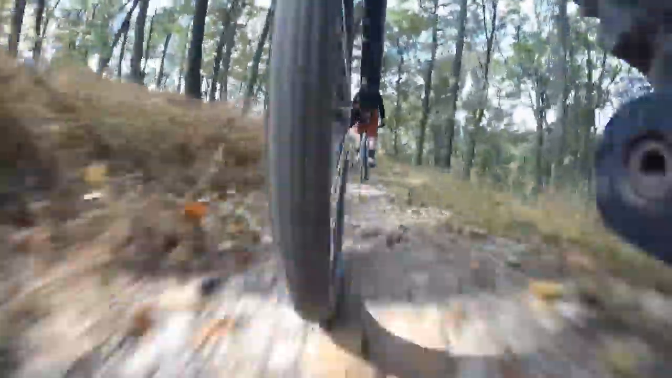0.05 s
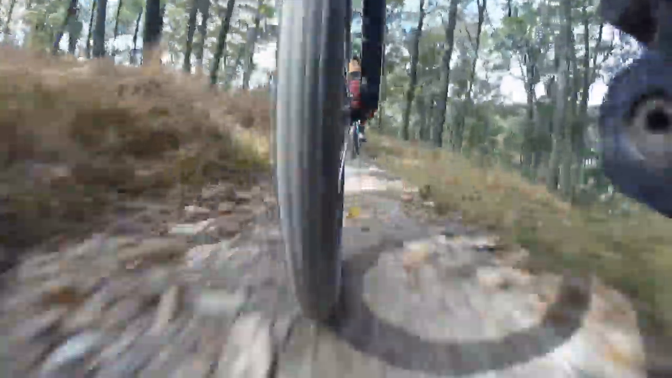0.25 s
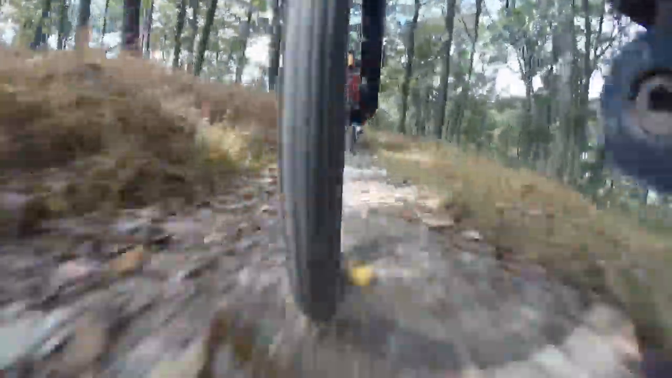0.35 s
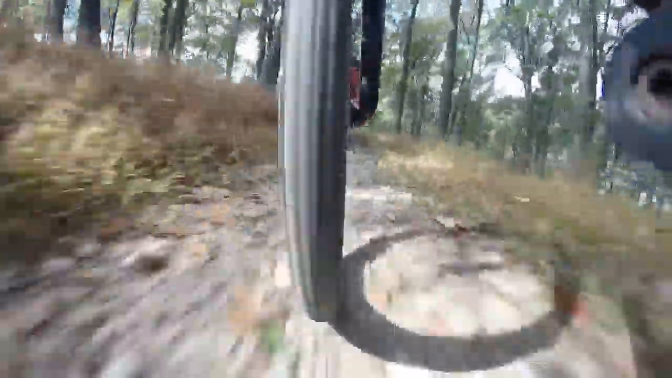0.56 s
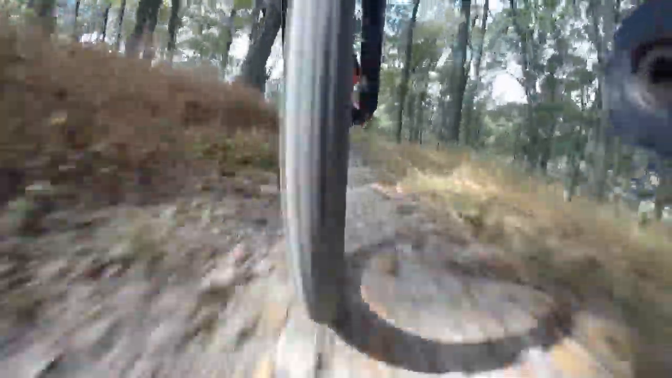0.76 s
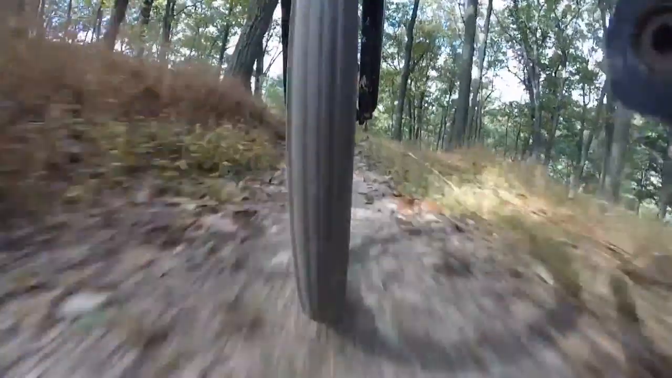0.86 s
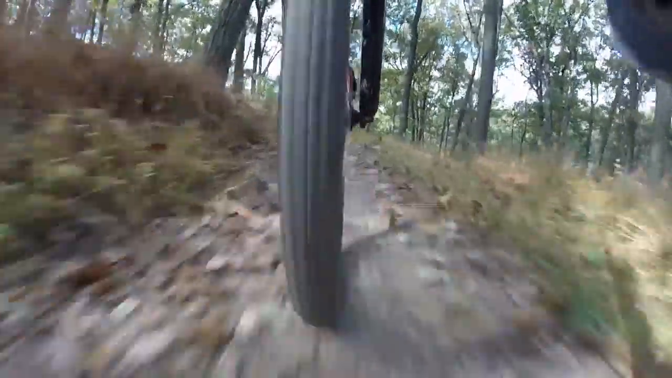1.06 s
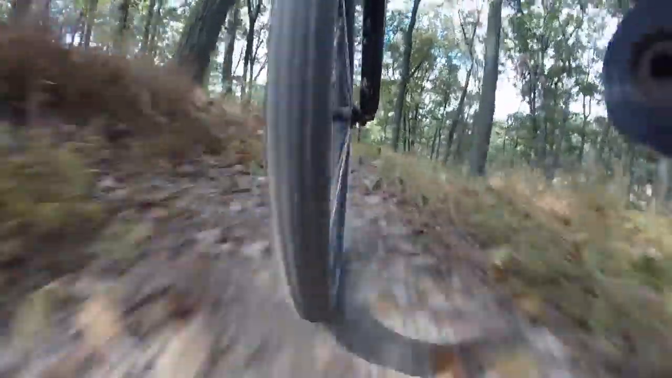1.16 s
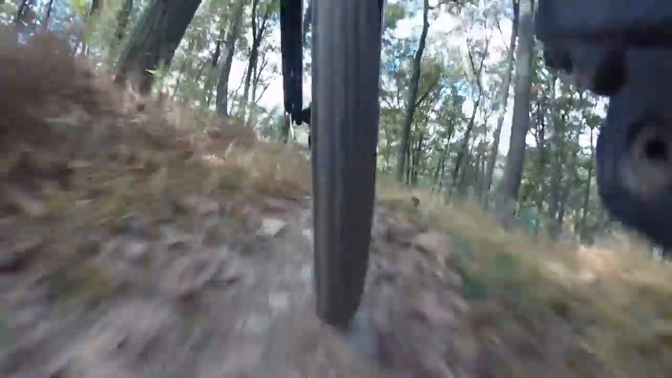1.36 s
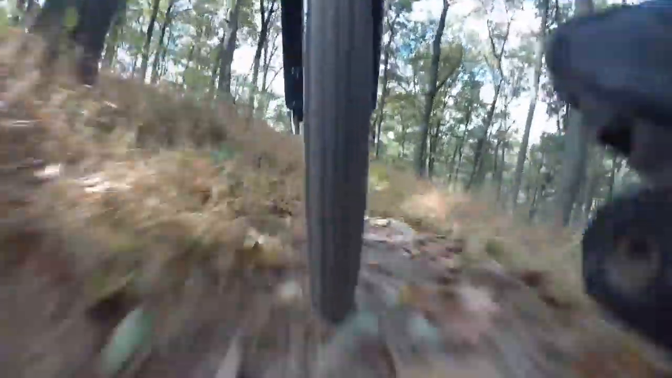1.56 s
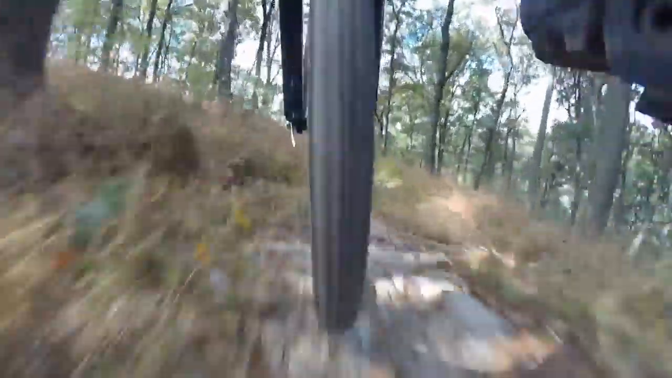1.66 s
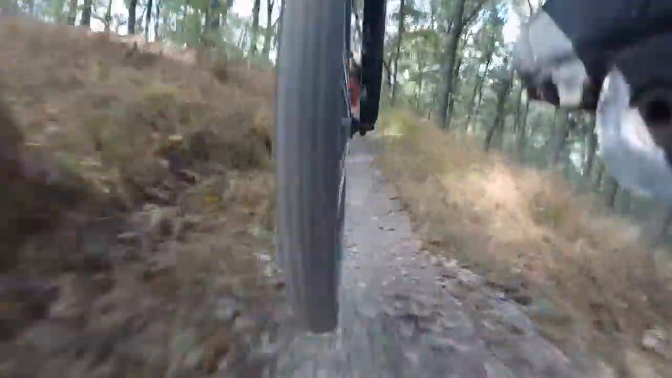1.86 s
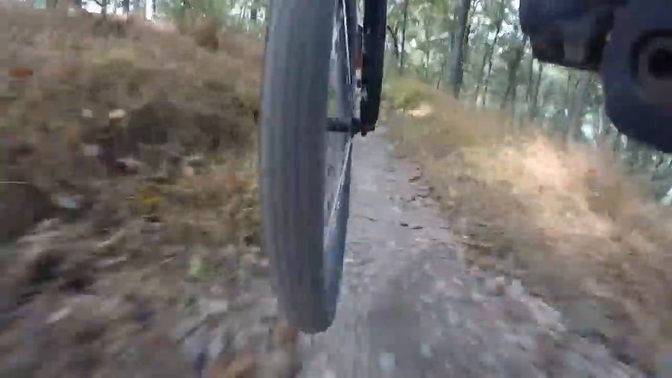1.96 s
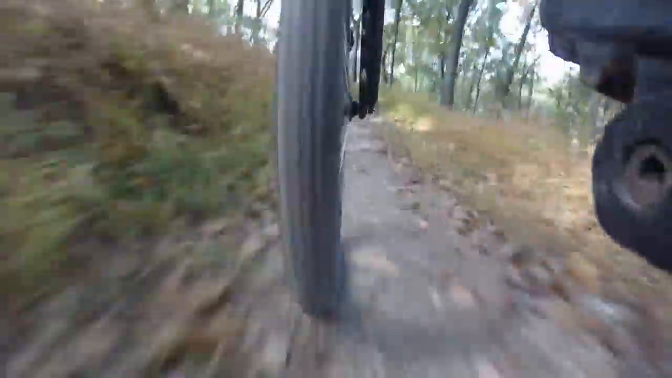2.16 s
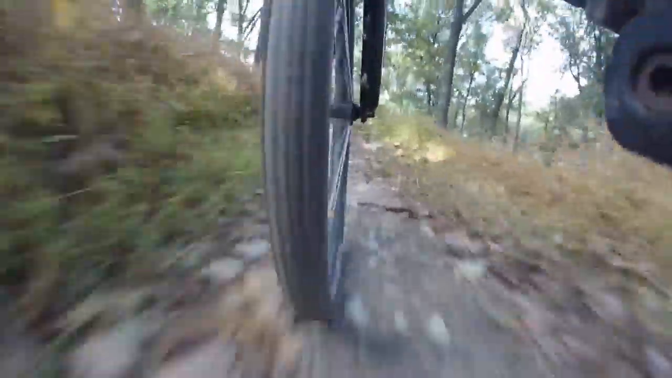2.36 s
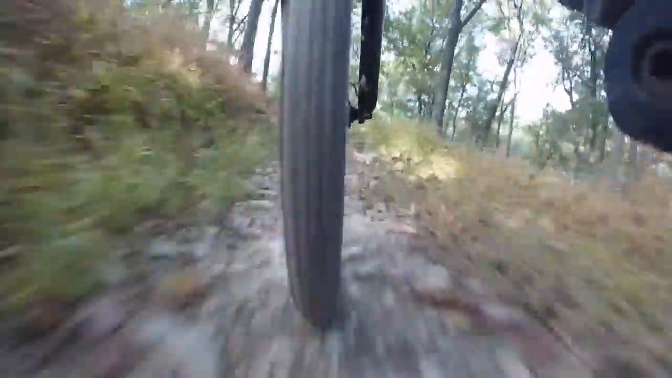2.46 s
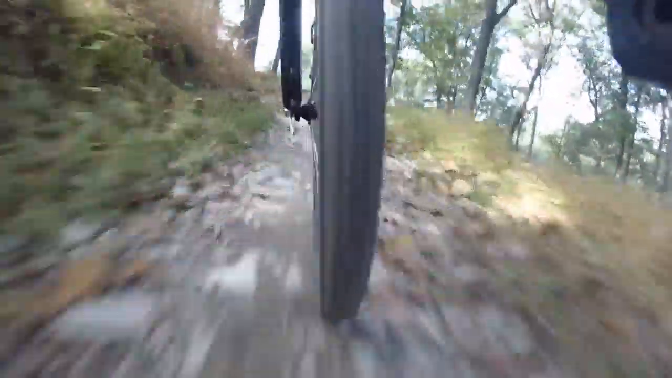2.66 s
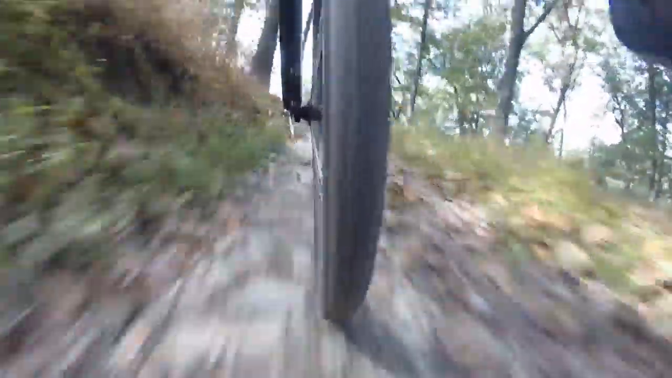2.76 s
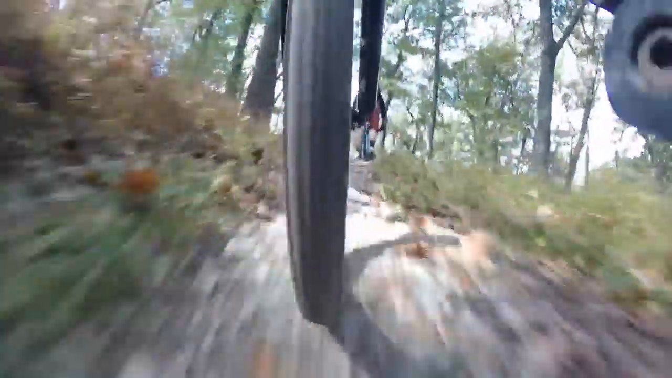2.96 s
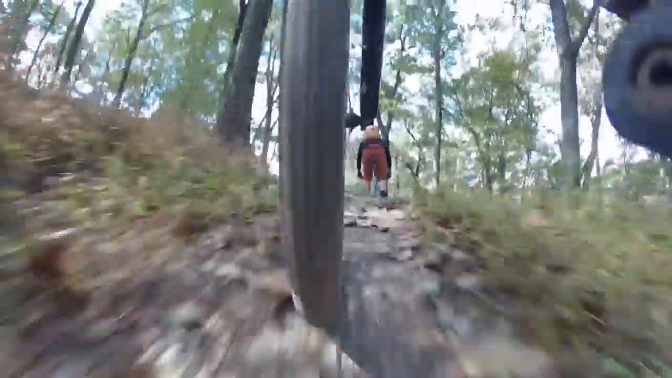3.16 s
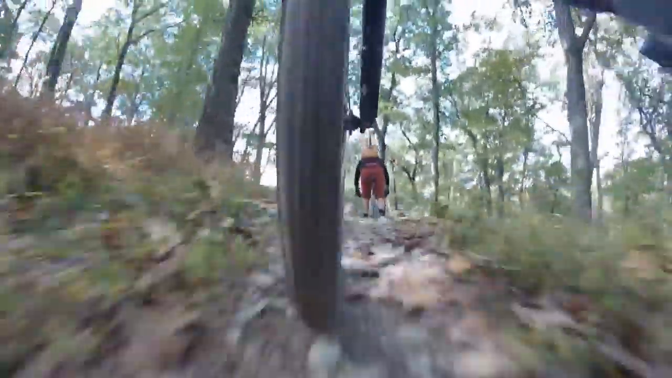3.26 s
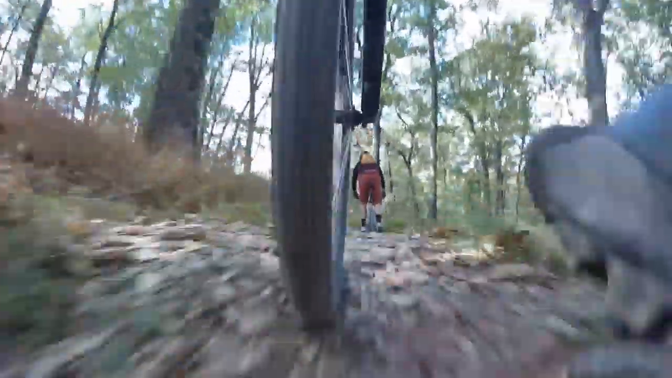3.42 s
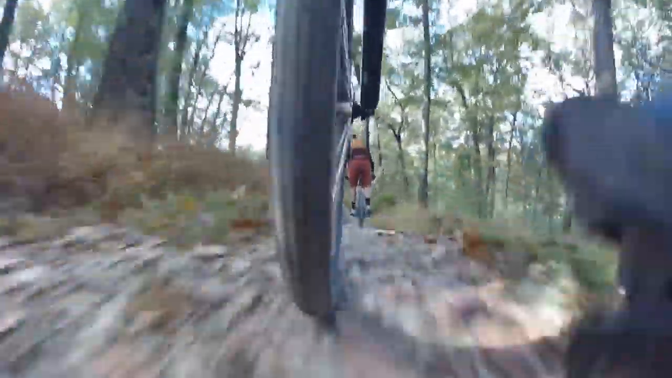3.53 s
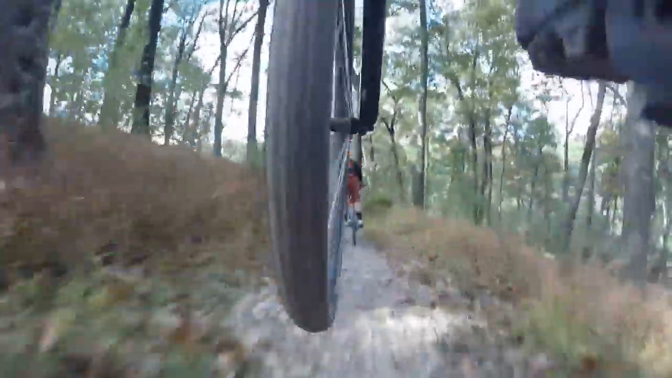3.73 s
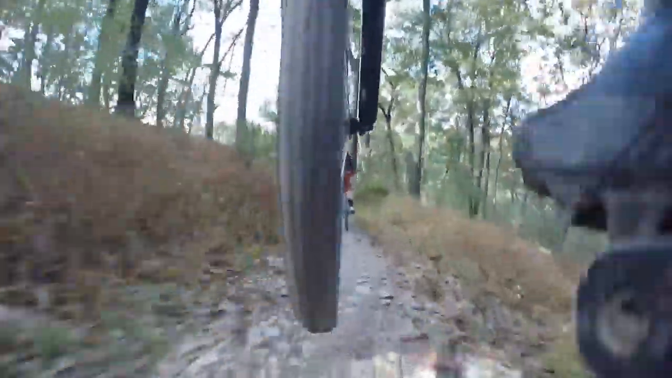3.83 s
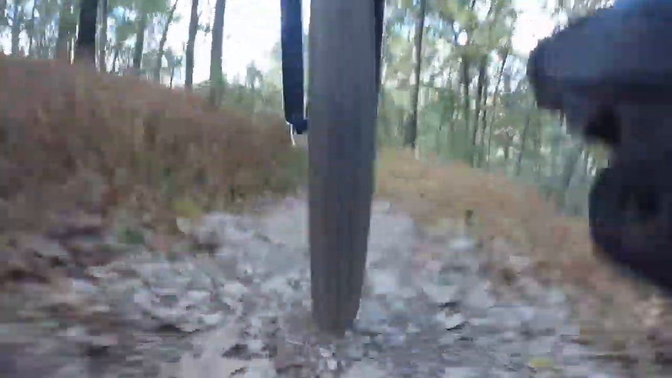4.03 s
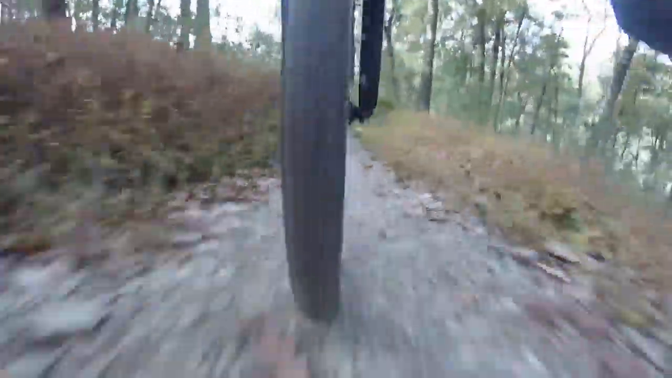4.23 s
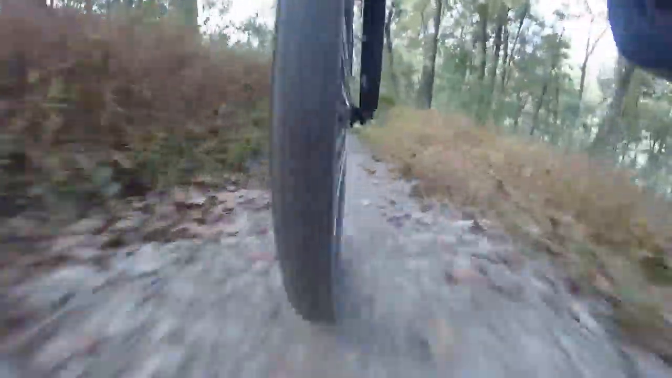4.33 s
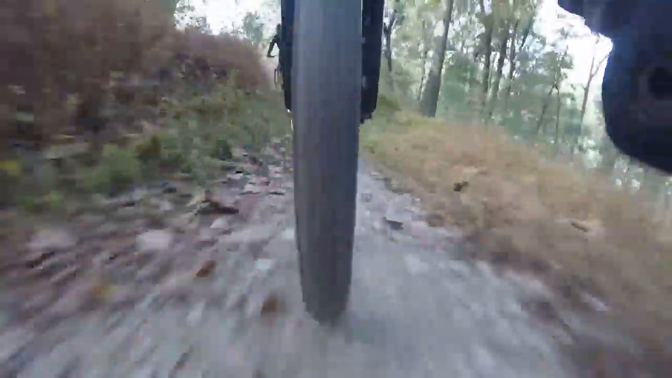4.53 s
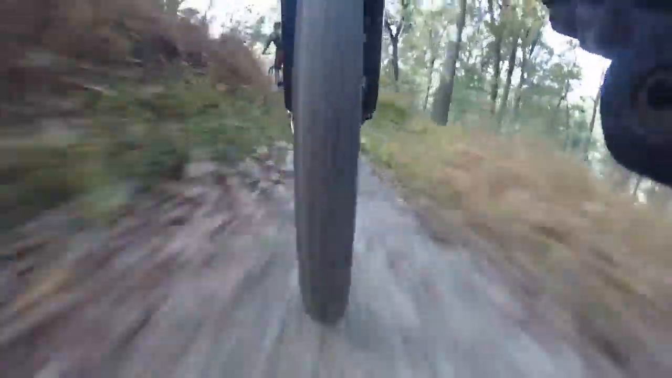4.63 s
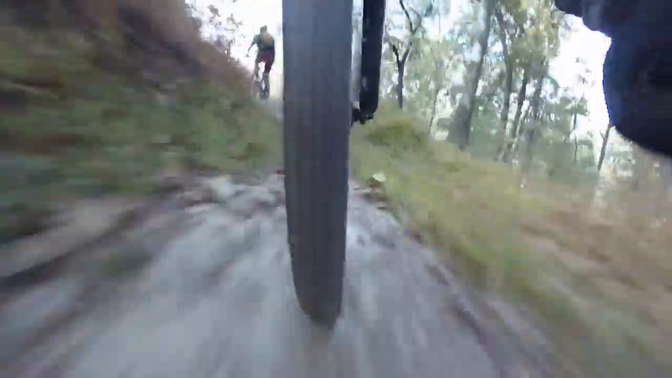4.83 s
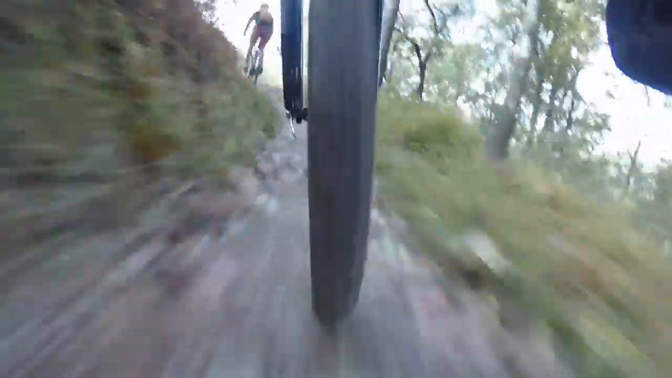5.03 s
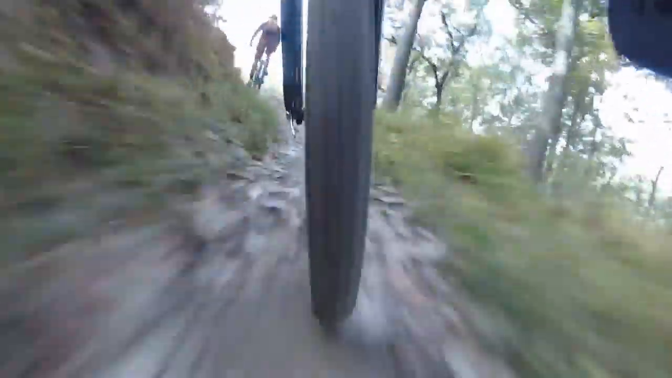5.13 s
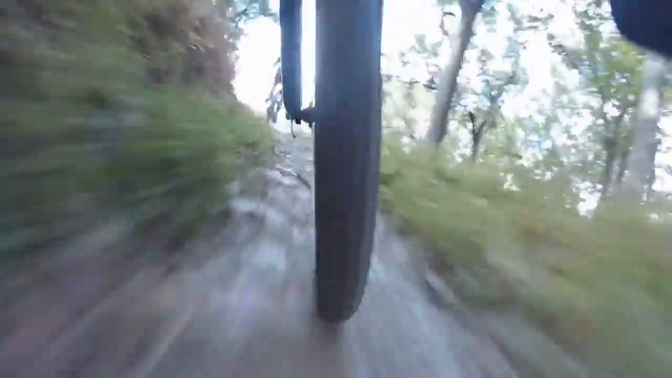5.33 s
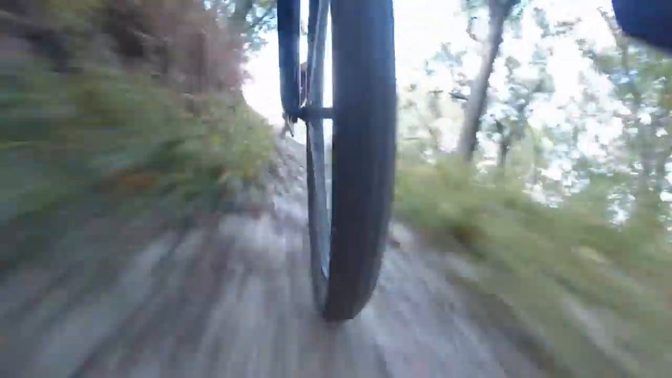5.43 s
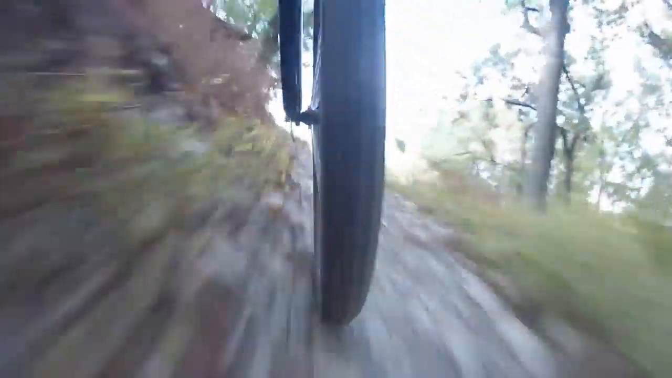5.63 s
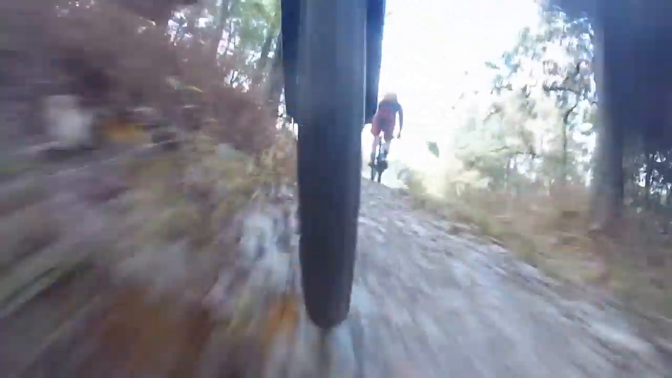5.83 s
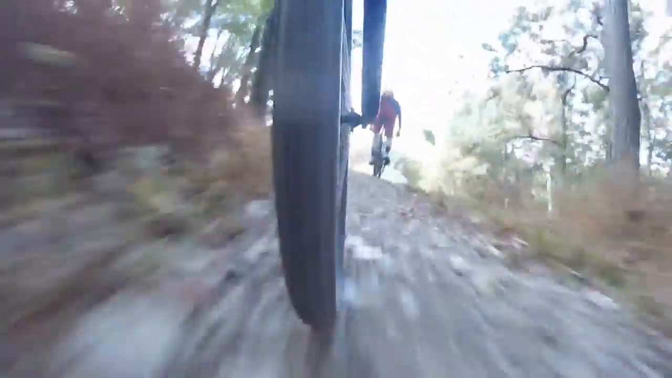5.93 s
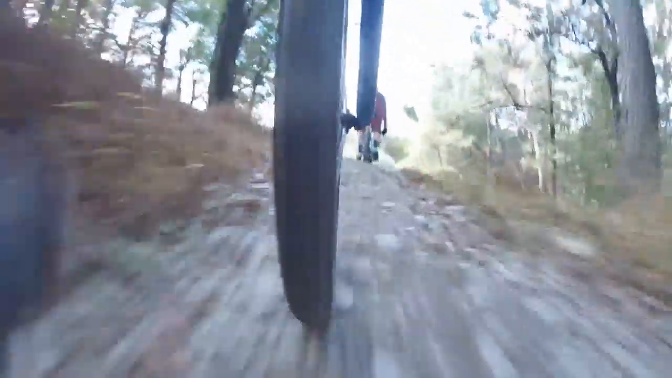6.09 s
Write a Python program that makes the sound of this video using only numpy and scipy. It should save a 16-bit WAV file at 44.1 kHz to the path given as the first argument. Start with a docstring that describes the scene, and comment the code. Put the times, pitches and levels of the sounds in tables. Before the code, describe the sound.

A mountain bike runs fast over a stony woodland trail, heard very close from low on its frame. A deep, uneven tyre drumming and bouncing rumble never stops for long; gravel crunches and small stones tick and clack on the frame. Near two and four seconds the wheels lift, the noise thins, then they land with a thump and clatter. The sound is dry and slightly dulled by the camera housing.

```python
"""A bicycle runs fast down a gravel trail, heard from a camera fixed low on its frame.
Noise through narrow resonances makes the tyre's drumming, the bounce of the frame and the fork's shudder.
Gravel, pebbles and clacks are short chattering strikes on the frame's modes; sand is steady noise through them.
Each bump loads the wheel, then lets it run light. Twice the wheels lift over a crest
and land with a thump and a clatter; a few very short, dry, bright clicks stand out."""
import sys
import numpy as np
from scipy import signal
from scipy.io import wavfile
from scipy.ndimage import uniform_filter1d

SR = 44100
rng = np.random.default_rng(int(sys.argv[2]) if len(sys.argv) > 2 else 0)


def waveform_to_disk(signal):
    """Save audio, clipped to [-1, 1], as 16-bit WAV at the path in sys.argv[1]."""
    frames = np.transpose(np.atleast_2d(signal))
    scaled = np.clip(frames, -1, 1) * 32767
    samples = np.round(scaled).astype(np.int16)
    wavfile.write(sys.argv[1], SR, samples)


N = 347508

# Loudest stones and rattling parts hitting the frame. Each row: start in seconds, level in dB over 10 ms,
# pitch centre in Hz, treble against body in dB, nominal chatter length in seconds.
CLACK_HITS = [(0.177, -14, 1530, -22.5, 0.0051), (0.23, -14.5, 2050, -16.5, 0.014),
              (0.555, -21.5, 1870, -35, 0.0042), (0.742, -20, 1900, -25, .012),
              (0.846, -22.5, 1850, -24, 0.021), (0.995, -18.5, 2230, -27, 0.0082),
              (1.075, -25, 1840, -11.5, 0.0071), (1.166, -18.5, 2450, -24, 0.0025),
              (1.183, -16.5, 1700, -26, 0.0093), (1.32, -27, 1590, -8, 0.0056),
              (1.402, -23, 2030, -19, 0.004), (1.442, -16, 1740, -15, 0.011),
              (1.709, -21.5, 2100, -26, 0.0082), (1.786, -23.5, 1700, -17, 0.0043),
              (1.925, -24.5, 2200, -24, 0.0034), (2.119, -18.5, 2000, -18, 0.0079),
              (2.145, -15.5, 1370, -21, 0.0029), (2.159, -27.5, 1580, 4, 0.0077),
              (2.265, -17, 1520, -13, 0.026), (2.367, -20.5, 1600, -13, .016),
              (2.682, -23, 1790, -22, 0.0031), (2.968, -22, 2060, -25, 0.0019),
              (3.079, -23.5, 1730, -22, 0.0087), (3.11, -24.5, 1900, -12, 0.0071),
              (3.147, -23, 1800, -14.5, 0.0042), (3.345, -26.5, 1920, -6, 0.0064),
              (3.405, -13, 1850, -24, 0.0067), (3.474, -19.5, 2210, -18, 0.0016),
              (3.502, -28.5, 1740, -4.5, 0.0048), (3.577, -19, 1470, -19.5, 0.014),
              (3.607, -15, 2480, -18, 0.012), (3.805, -22.5, 1810, -18, .008),
              (4.021, -15.5, 1570, -14, 0.024), (4.049, -15, 1600, -14, 0.0019),
              (4.131, -11.5, 1680, -14.5, 0.014), (4.163, -16.5, 2470, -6.5, 0.0024),
              (4.184, -17.5, 1510, -14, 0.011), (4.257, -23, 1710, -9, 0.0072),
              (4.406, -14, 1690, -20, 0.0069), (4.577, -21.5, 1700, -14, 0.006),
              (4.947, -18.5, 1910, -25, 0.0065), (5.017, -29, 2110, -7.5, .003),
              (5.054, -20.5, 1500, -29, 0.0054), (5.119, -22.5, 1900, -5.5, 0.023),
              (5.147, -19, 2090, -22, 0.016), (5.221, -22.5, 1460, -16.5, .016),
              (5.413, -19, 1640, -10.5, 0.0079), (5.472, -21.5, 2140, -22, 0.0075),
              (5.581, -26, 1640, -21.5, 0.011), (5.88, -26.5, 1600, -13, 0.0062),
              (5.98, -10, 1980, -19.5, 0.017), (6.075, -19.5, 1710, -15, 0.079),
              (6.246, -15, 2480, -36, 0.0046), (6.731, -20.5, 1810, -10, 0.015),
              (6.819, -17.5, 1240, -19, 0.0057), (6.969, -13.5, 1760, -36, 0.0022),
              (7.037, -28, 1400, -40, .002), (7.085, -16, 2240, -18, 0.0059),
              (7.111, -24, 2210, -2.5, 0.0044), (7.173, -26.5, 1500, -7, 0.005),
              (7.275, -21.5, 1810, -17, 0.02), (7.393, -21.5, 1470, -14, 0.014),
              (7.732, -18.5, 1620, -21.5, .004), (7.77, -18, 1700, -13.5, 0.036),
              (7.852, -19, 1600, -15, 0.0038)]
# Resonances of the bicycle frame. Each row: frequency in Hz, width in Hz before extra damping, relative level in dB.
FRAME_MODES = [(589, 39, -9.5), (801, 80, -0.5), (1011, 68, -0.5), (1150, 81, -2), (1399, 96, 2.5),
               (1582, 12, 0), (1809, 14, 4.5), (1950, 340, -6.5), (2315, 208, 0.5), (2640, 84, -4.5),
               (2860, 42, -2), (3280, 26, -4.5), (3483, 213, -2.5), (3715, 110, -6.5), (4426, 65, -7),
               (4720, 63, -11.5), (5230, 440, -23.5), (5510, 120, -15), (6290, 140, -17),
               (6940, 300, -22.5), (7570, 110, -24.5), (8000, 130, -25.5), (8900, 400, -32),
               (9800, 350, -33.5), (10400, 340, -27.5), (12000, 360, -32.5)]
TREBLE_HZ = 4300   # splits the frame's low modes from its high ones


def from_db(db):
    """Decibels to gain."""
    return 10 ** (np.asarray(db) / 20)


def rms_one(x):
    """Scales to an rms of 1."""
    return x / np.sqrt(np.mean(x ** 2) + 1e-20)


def in_time(rows):
    """Level curve of (s, dB) rows, interpolated to one value a sample."""
    s, level_db = np.transpose(rows)
    return np.interp(np.arange(N) / SR, s, level_db)


def cut(x, hz, kind, order=2):
    """Butterworth low- or high-pass."""
    sos = signal.butter(order, min(hz, 0.45 * SR), kind, fs=SR, output="sos")
    return signal.sosfilt(sos, x)


def drift(rate_hz):
    """Low-passed noise of rms 1, for random level swings."""
    return rms_one(cut(rng.standard_normal(N + SR), rate_hz, "low")[SR:])


def evened(x, seconds):
    """Holds the rms at 1 over the given span and leaves faster flutter alone."""
    power = np.abs(uniform_filter1d(x ** 2, int(seconds * SR)))
    return x / np.sqrt(power + 1e-12)


def add(track, at_s, sound):
    """Mixes a sound into the track."""
    start = max(int(at_s * SR), 0)
    track[start:start + len(sound)] += sound[:max(N - start, 0)]


def ringing(modes, size):
    """One decaying sine a mode; its dB is the height of its resonance."""
    hz, width_hz, level_db = np.transpose(modes)[:, :, None]
    t = np.arange(size) / SR
    decay = np.exp(-np.pi * width_hz * t)
    return from_db(level_db) * width_hz * decay * np.sin(2 * np.pi * hz * t)


def rumble(modes):
    """The uneven ground shakes each mode with its own white noise."""
    out = np.zeros(N)
    for ring in ringing(modes, size=12000):
        noise = rng.standard_normal(N + len(ring) - 1)
        out += signal.fftconvolve(noise, ring, "valid")
    return out


def wheel_load():
    """Extra load on the wheel: 0 on even ground, up to 1 on a bump, below 0 on the rebound."""
    rise_s, fall_s = 0.02, 0.063
    full_db = -18.5   # clack level that loads the wheel about fully
    rebound_s, rebound_share = 0.1, 0.45
    t = np.arange(0, N, 100) / SR
    push = np.zeros(len(t))
    for s, hit_db, *_ in CLACK_HITS:   # every clack marks a bump
        push += from_db(hit_db - full_db) * np.exp(-np.maximum((s - t) / rise_s, (t - s) / fall_s))
    load = np.tanh(push)
    now = np.arange(N) / SR
    return np.interp(now, t, load) - rebound_share * np.interp(now - rebound_s, t, load)


def aloft():
    """1 while the wheels are in the air, else 0; they lift off gently and land at once."""
    # Each row: take-off in seconds, landing in seconds.
    jumps = [(1.876, 2.102), (3.704, 4.017)]
    t = np.arange(N) / SR
    return sum(np.clip((t - up) / 0.04, 0, 1) * np.clip((down - t) / 0.004, 0, 1) for up, down in jumps)


def unloaded(level_db, ceiling_db):
    """In the air nothing drives the bicycle, so its noises stay under a low ceiling."""
    return level_db - aloft() * np.maximum(level_db - ceiling_db, 0)


def ride():
    """Levels of shake, drumming and crunch from the lie of the trail, bumps, random swings and jumps."""
    # Basic levels of frame bounce, tyre drumming and gravel crunch (how loose the gravel is).
    # Each row: time in seconds, level in dB before the offsets below.
    bouncing = [(0.0, -27), (0.28, -15), (1.73, -21.5), (2.02, -42.5), (2.15, -14.5), (2.24, -29),
                (2.7, -13), (2.81, -32.5), (2.94, -8), (3.01, -24.5), (3.66, -17), (3.95, -43), (4.04, -21),
                (4.67, -23), (6.47, -20), (6.52, -25.5), (7.84, -19), (7.88, -12)]
    drumming = [(0.0, -21.5), (0.04, -19), (1.07, -14), (1.27, -22), (1.29, -19), (1.65, -15),
                (1.93, -30.5), (2.13, -18.5), (2.15, -24), (2.41, -18), (3.56, -21), (3.95, -34),
                (4.04, -12.5), (4.06, -24), (4.81, -16.5), (4.96, -18.5), (5.73, -18), (6.21, -24),
                (6.36, -18), (6.43, -31), (6.52, -17), (7.27, -22), (7.31, -16.5), (7.88, -20)]
    crunch = [(0.0, -34), (0.94, -29.5), (1.65, -32.5), (1.84, -38), (2.15, -38.5), (2.33, -32),
              (2.52, -28.5), (2.72, -32.5), (2.94, -35), (3.07, -29), (3.49, -33.5), (3.75, -33),
              (4.04, -31.5), (4.24, -30), (4.63, -34), (5.05, -27.5), (5.2, -36.5), (5.42, -34),
              (6.14, -32.5), (6.41, -34), (7.75, -33), (7.88, -30.5)]
    load, swing_hz = wheel_load(), 9.1
    # basic level + offset + effect of a full load + random swing, all in dB
    shake_db = in_time(bouncing) + 0.2 + 2 * load + 3.0 * drift(swing_hz)
    drum_db = in_time(drumming) + 1.21 - 0.5 * load + 1.86 * drift(swing_hz)
    crunch_db = in_time(crunch) - 2.5 + 2.5 * load
    return (unloaded(np.minimum(shake_db, -10), ceiling_db=-33.5),
            unloaded(drum_db, ceiling_db=-26),
            unloaded(crunch_db, ceiling_db=-41.5))


def frame_rings(soft_hz=4300, damping_per_s=25):
    """The frame's low modes, which any soft contact wakes, and its high ones, which need a hard contact."""
    t = np.arange(1800) / SR
    rings = ringing(FRAME_MODES, size=len(t)) * np.exp(-damping_per_s * t)   # mud and cables damp the tubes
    high = np.array(FRAME_MODES)[:, 0] > TREBLE_HZ
    return np.where(high[:, None], rings, cut(rings, soft_hz, "low", order=3)), high


def contact(count, spread_db):
    """A point of contact drives each mode with a random strength and sign."""
    return from_db(spread_db * rng.standard_normal(count)) * rng.choice([-1, 1], count)


def strike(frame, centre_hz, bright_db, length_s, tail_s=0.0018, linger=0.67, rise_s=0.0004,
           spiky=1.63, octaves=0.96, hardening=0.52):
    """A few milliseconds of chatter on one spot of the frame, with the energy of 10 ms at 0 dB."""
    rings, high = frame
    hz = np.array(FRAME_MODES)[:, 0]
    t = np.arange(rings.shape[1]) / SR
    grains = rng.standard_normal(len(t))
    force = np.sign(grains) * np.abs(grains) ** spiky * np.minimum(t / rise_s, 1)
    force *= np.exp(-np.maximum(t - 0.52 * length_s, 0) / (tail_s + linger * length_s))
    strengths = contact(len(hz), spread_db=2.5)
    # small stones ring higher; hard ones reach the topmost modes
    size_colour = np.exp(-0.5 * (np.log2(hz / centre_hz) / octaves) ** 2)
    hard_colour = from_db(hardening * (bright_db + 4) * np.log2(hz / TREBLE_HZ))
    body_ring = (strengths * size_colour * ~high) @ rings
    treble_ring = (strengths * hard_colour * high) @ rings
    body = signal.fftconvolve(force, body_ring)
    treble = signal.fftconvolve(force, treble_ring)
    share = from_db(bright_db)
    hit = body / np.linalg.norm(body) + share * treble / np.linalg.norm(treble)
    return hit * np.sqrt(SR / 100 / (1 + share ** 2))


def shake(level_db, low_hz=20, top_hz=100):
    """Bumps bounce the frame and the camera with it."""
    # The whole bicycle bouncing on its tyres. Each row: frequency in Hz, width in Hz, relative level in dB.
    bounce_modes = [(25, 10, -14.5), (41.4, 12, -5.5), (51.3, 8.4, 9)]
    bounce = cut(cut(rumble(bounce_modes), low_hz, "high"), top_hz, "low")
    return from_db(level_db) * evened(bounce, seconds=0.12)


def tyre(level_db, flutter_db=0.5, flutter_hz=17, top_hz=410):
    """The tyre drums like a hollow ring as it runs over the stones."""
    # Air and casing of the tyre. Each row: frequency in Hz, width in Hz, relative level in dB.
    tyre_modes = [(160, 200, -26), (205, 14.2, 2), (224.7, 19.4, 1), (244, 8.1, -0.5), (294, 66, -15),
                  (339, 33, -14), (360, 27, -22.5)]
    drum = cut(rumble(tyre_modes), top_hz, "low", order=4)
    drum = drum * from_db(flutter_db * drift(flutter_hz))
    return from_db(level_db) * evened(drum, seconds=0.091)


def judder(level_db, top_hz=260):
    """Coarse ground makes the fork shudder."""
    # Fork and stays flexing. Each row: frequency in Hz, width in Hz, relative level in dB.
    fork_modes = [(94, 73, -0.5), (146, 170, -1.5)]
    shudder = cut(rumble(fork_modes), top_hz, "low", order=3)
    return from_db(level_db) * evened(shudder, seconds=0.32)


def gravel(level_db, frame, size_db=4.5, centre_hz=1550, scatter_octaves=0.6, bright_db=-28,
           hardness_db=10.5, length_s=0.002, count=700):
    """Loose stones shift under the tread at random, each with its own size, pitch and hardness."""
    crunch = np.zeros(N)
    times = rng.uniform(0, N / SR, count)
    traits = np.clip(rng.standard_normal((count, 3)), -2, 2)
    for s, (size, pitch, hard) in zip(times, traits):
        pitch_hz = centre_hz * 2 ** (scatter_octaves * pitch)
        hit = strike(frame, pitch_hz, bright_db + hardness_db * hard, length_s)
        add(crunch, s, from_db(size_db * size) * hit)
    return from_db(level_db) * evened(crunch, seconds=0.47)


def sand(level_db, frame, tilt_db_per_octave=-6.0, hiss_db=-3.0, flutter_db=1.0, flutter_hz=26, count=6):
    """Fine dirt is crushed without a break: the frame's low modes murmur, the high ones hiss faintly."""
    rings, high = frame
    octaves = np.log2(np.array(FRAME_MODES)[:, 0] / TREBLE_HZ)
    strengths = np.where(high, from_db(hiss_db), from_db(tilt_db_per_octave * octaves))
    murmur = np.zeros(N)
    for _ in range(count):
        noise = rng.standard_normal(N)
        ring = (strengths * rng.choice([-1, 1], len(strengths))) @ rings
        murmur += signal.oaconvolve(noise, ring)[:N]
    return from_db(level_db + flutter_db * drift(flutter_hz)) * rms_one(murmur)


def pebbles(crunch_db, frame, level_db=-29, size_db=6.0, follow=0.95, centre_hz=1900, scatter_octaves=0.61,
            bright_db=-14.5, hardness_db=8.5, length_s=0.005, length_spread=0.48, count=30):
    """The tread keeps flicking small stones at the frame, harder where the gravel is loose."""
    out = np.zeros(N)
    looseness_db = crunch_db - np.median(crunch_db)
    times = (np.arange(count) + rng.random(count)) / count * N / SR
    traits = 2 * rng.random((count, 4)) - 1
    for s, (size, pitch, hard, slow) in zip(times, traits):
        hit = strike(frame, centre_hz * 2 ** (scatter_octaves * pitch), bright_db + hardness_db * hard,
                     length_s * np.exp(length_spread * slow))
        hit_db = level_db + size_db * size + follow * looseness_db[int(s * SR)]
        add(out, s, from_db(hit_db) * hit)
    return out


def clacks(frame):
    """Bigger stones and rattling parts hit the frame."""
    out = np.zeros(N)
    for s, hit_db, centre_hz, bright_db, length_s in CLACK_HITS:
        add(out, s, from_db(hit_db) * strike(frame, centre_hz, bright_db, length_s))
    return out


def clicks(tail_s=0.0011, tail_db=-22.5):
    """An impulse with a brief noise tail excites high, broad resonances: a dry, bright click."""
    # Very short, dry, bright clicks. Each row: start in seconds, peak in dB.
    click_peaks = [(0.8354, -29), (2.162, -10), (3.0037, 2.5), (4.164, -2), (7.4161, -16.5)]
    # Resonances that colour the clicks. Each row: frequency in Hz, width in Hz, relative level in dB.
    click_modes = [(3120, 700, -17), (4650, 630, 6.5), (5370, 1400, 11), (7100, 900, -9), (8200, 810, -2),
                   (9900, 900, 6), (12700, 900, -20)]
    t = np.arange(700) / SR
    ring = ringing(click_modes, size=len(t)).sum(axis=0)
    out = np.zeros(N)
    for s, peak_db in click_peaks:
        tail = from_db(tail_db) * rng.standard_normal(len(t)) * np.exp(-t / tail_s)
        click = signal.fftconvolve((t == 0) + tail, ring)
        add(out, s, from_db(peak_db) * click / np.abs(click).max())
    return out


def thumps(drum_hz=225, drum_s=0.0028, heave_hz=60, heave_s=0.0079, cushion_hz=430):
    """A hard knock squashes the tyre: a short drum note and one heave of the frame."""
    # Knocks of the wheel on the ground. Each row: start in seconds, drum note in dB and
    # heave of the frame in dB, both before decay and cushioning.
    knocks = [(1.533, 4.5, -25), (2.107, 4, -22), (2.146, -23, 1), (2.931, -12, -8), (3.678, -0.5, -17),
              (4.018, -4, -12), (4.049, -17, -4.5), (7.086, 4.5, -9), (7.573, -6, -5)]
    t = np.arange(8000) / SR
    drum = np.exp(-t / drum_s) * np.sin(2 * np.pi * drum_hz * t)
    heave = np.exp(-t / heave_s) * np.sin(2 * np.pi * heave_hz * t)
    out = np.zeros(N)
    for s, drum_db, heave_db in knocks:
        knock = from_db(drum_db) * drum + from_db(heave_db) * heave
        add(out, s, cut(knock, cushion_hz, "low", order=4))   # rubber cushions the blow
    return out


def scene():
    """Wheels, gravel and frame, all close to the camera."""
    shake_db, tyre_db, gravel_db = ride()
    frame = frame_rings()
    # the fork answers to coarse ground and to the size of the bumps, as far as it can flex
    bump_db = shake_db - np.mean(shake_db)
    fork_db = np.minimum(6.0 + gravel_db + 0.48 * bump_db - 4 * aloft(), -24)
    wheels = from_db(-0.5) * shake(shake_db) + from_db(1.0) * tyre(tyre_db) + judder(fork_db)
    ground = from_db(2.0) * gravel(gravel_db, frame) + from_db(1.0) * sand(gravel_db, frame)
    hits = pebbles(gravel_db, frame) + clacks(frame) + clicks() + thumps()
    return (wheels + ground + hits)[None]


def record(dry):
    """The housing dulls the top, the highest peaks are rounded, the band ends steeply at 15.8 kHz."""
    dull = cut(dry, 12000, "low", order=4)
    rounded = 0.95 * dull / (1 + dull ** 8) ** (1 / 8)
    band_limit = signal.ellip(10, 0.2, 70, 15800, fs=SR, output="sos")
    return signal.sosfilt(band_limit, rounded)


dry = scene()
out = record(dry)
waveform_to_disk(out)
```